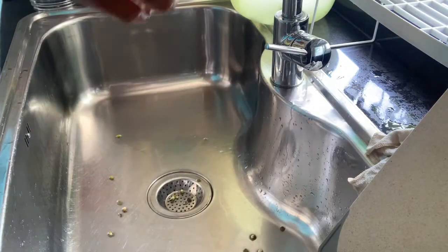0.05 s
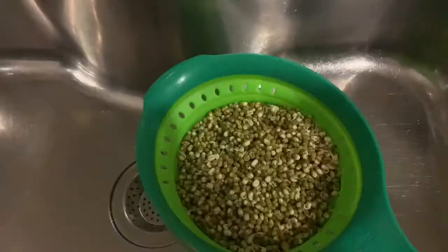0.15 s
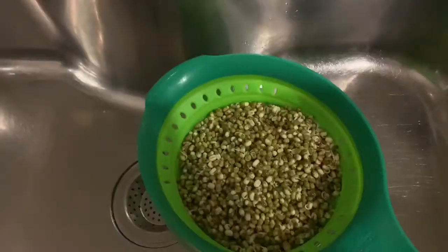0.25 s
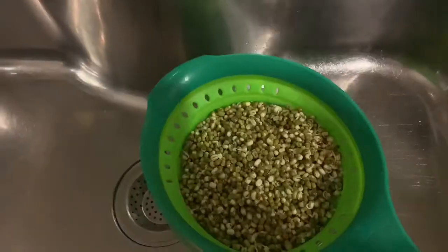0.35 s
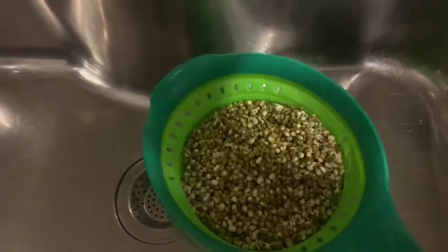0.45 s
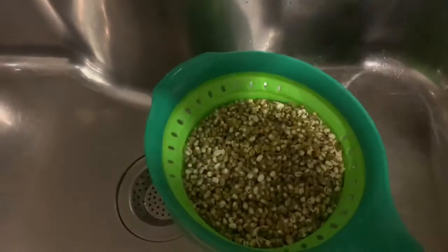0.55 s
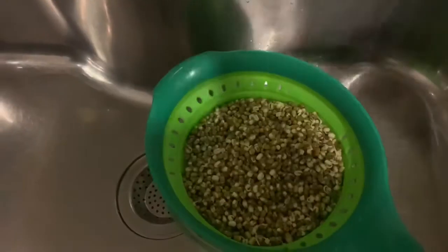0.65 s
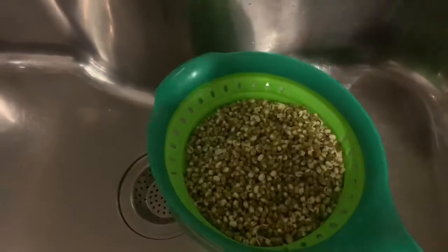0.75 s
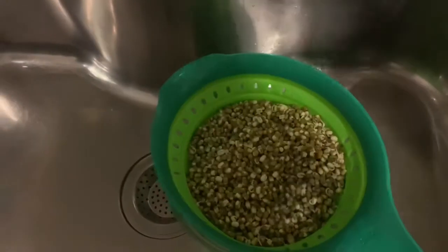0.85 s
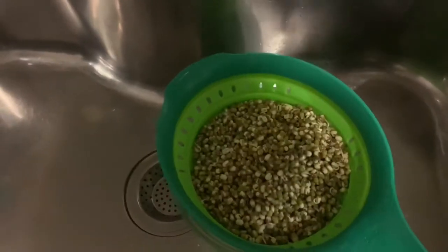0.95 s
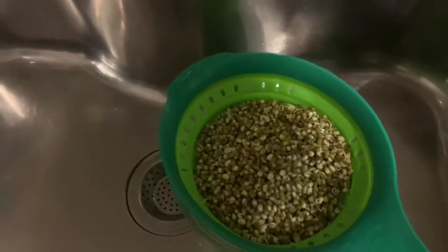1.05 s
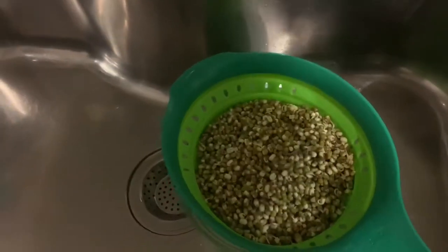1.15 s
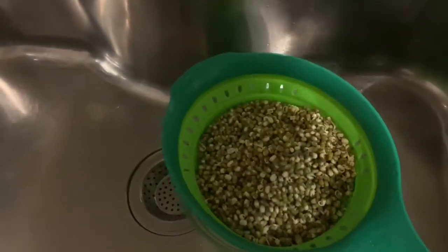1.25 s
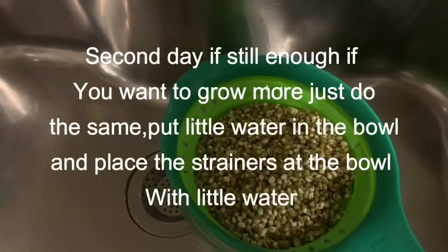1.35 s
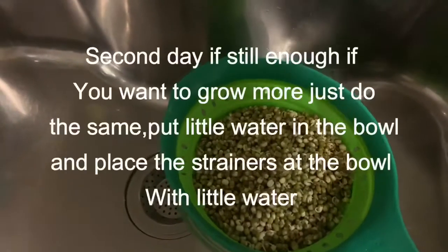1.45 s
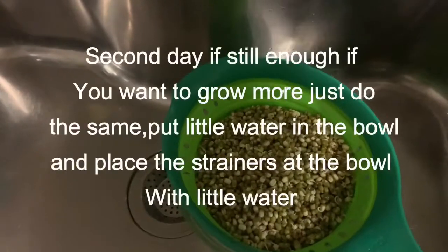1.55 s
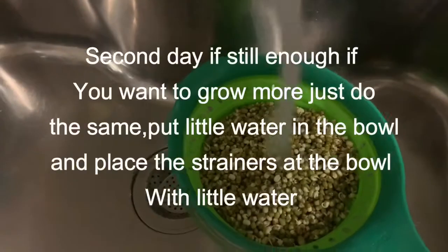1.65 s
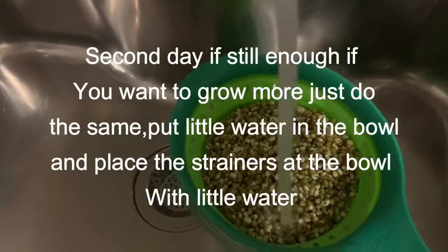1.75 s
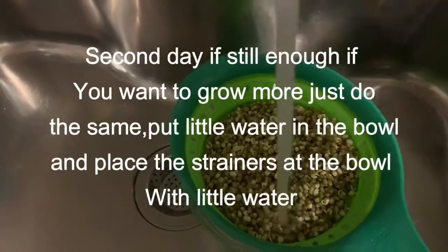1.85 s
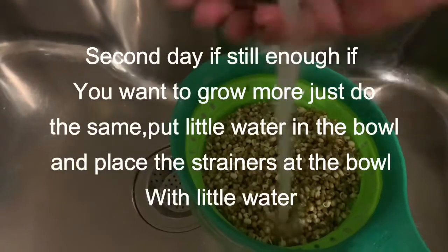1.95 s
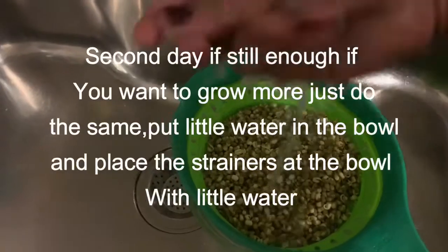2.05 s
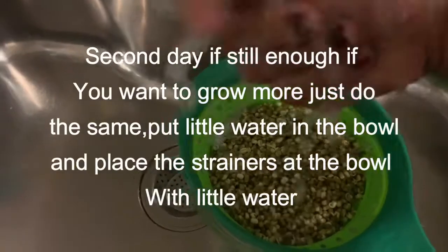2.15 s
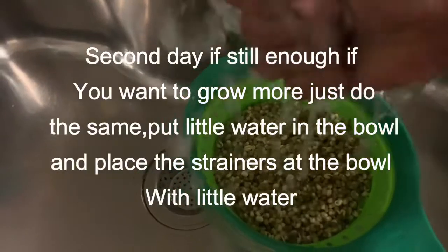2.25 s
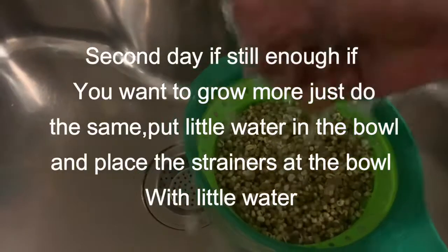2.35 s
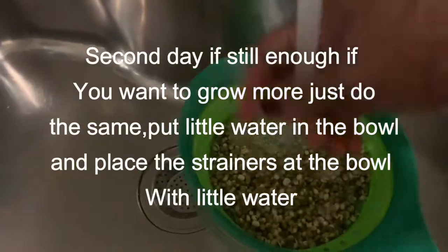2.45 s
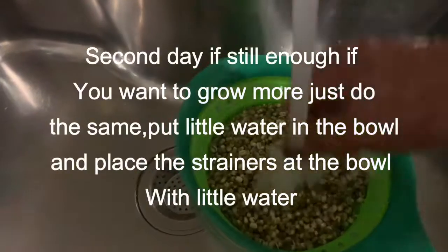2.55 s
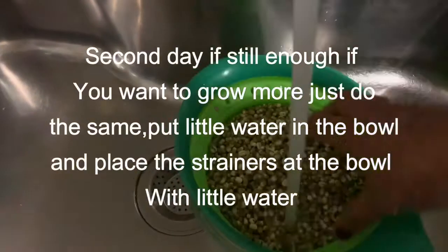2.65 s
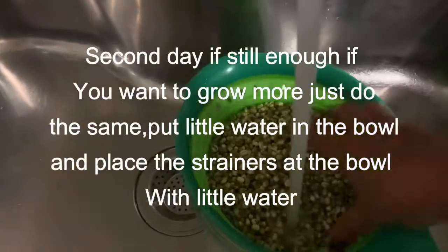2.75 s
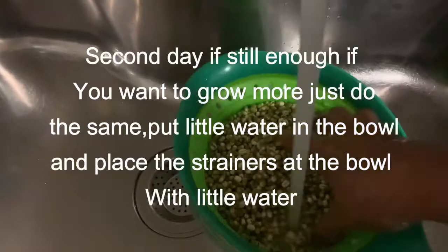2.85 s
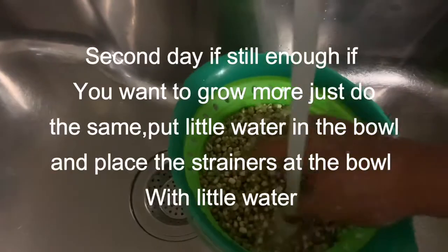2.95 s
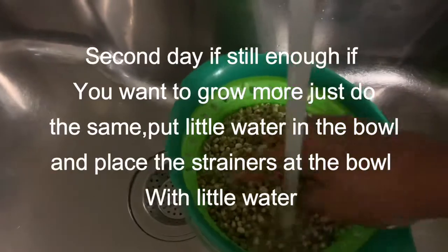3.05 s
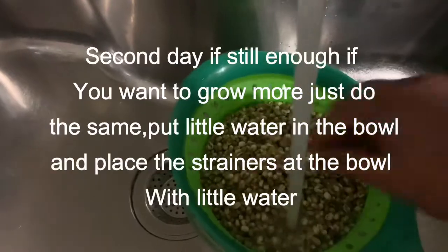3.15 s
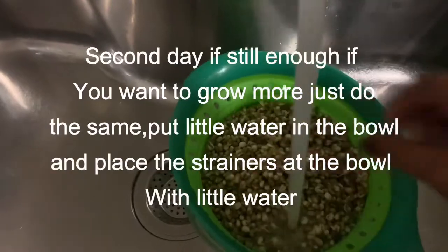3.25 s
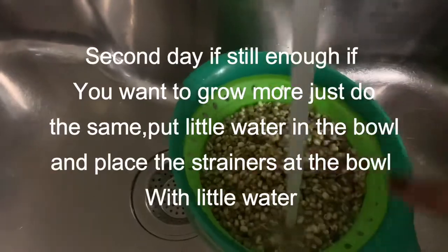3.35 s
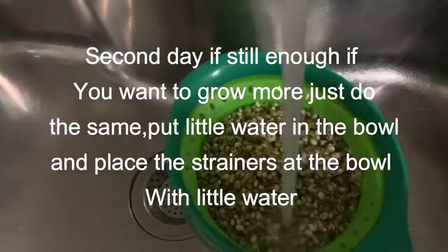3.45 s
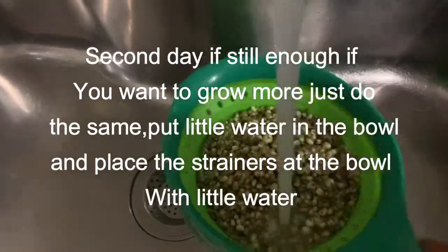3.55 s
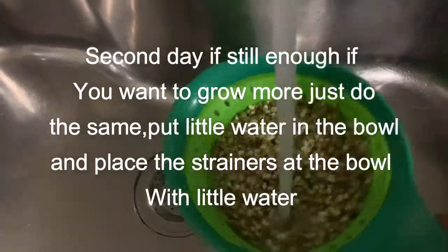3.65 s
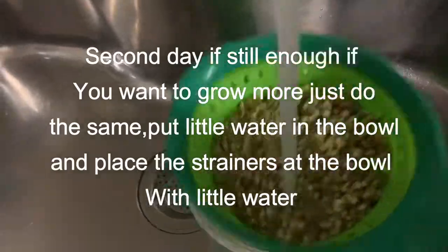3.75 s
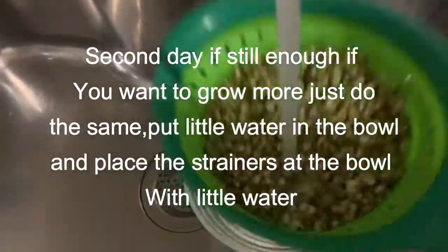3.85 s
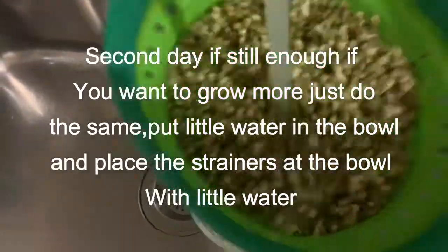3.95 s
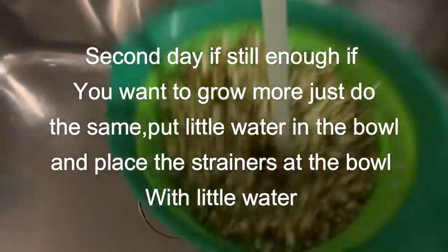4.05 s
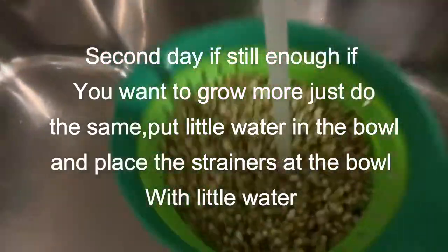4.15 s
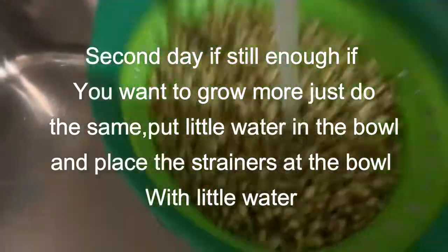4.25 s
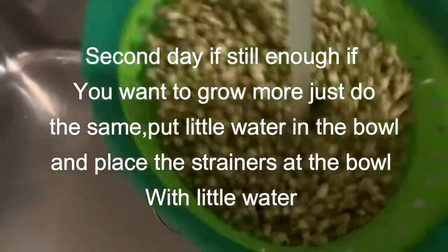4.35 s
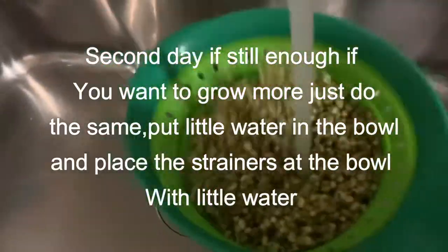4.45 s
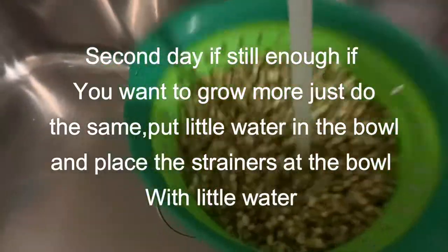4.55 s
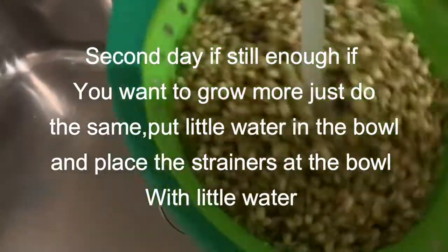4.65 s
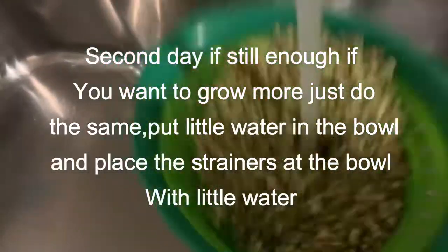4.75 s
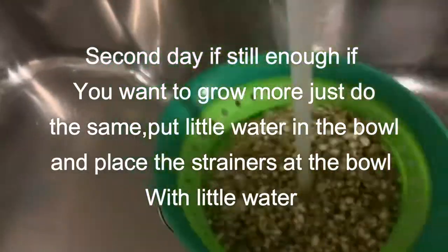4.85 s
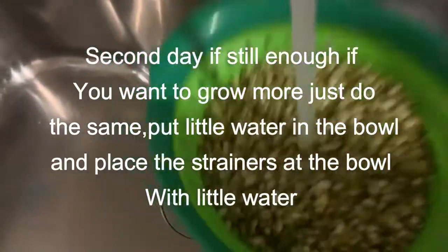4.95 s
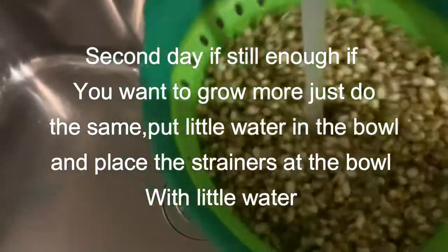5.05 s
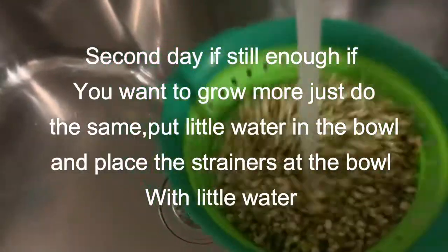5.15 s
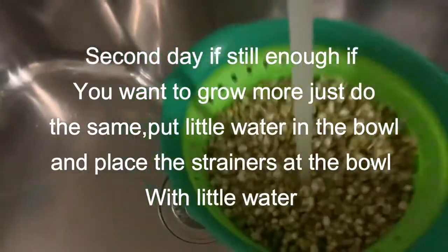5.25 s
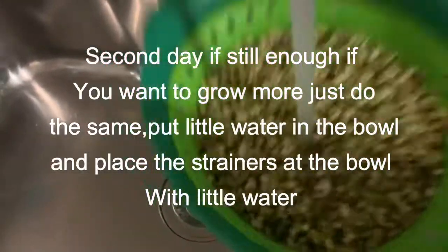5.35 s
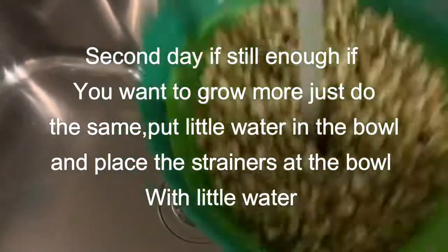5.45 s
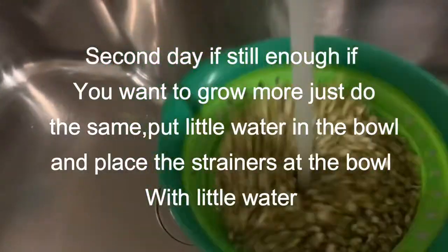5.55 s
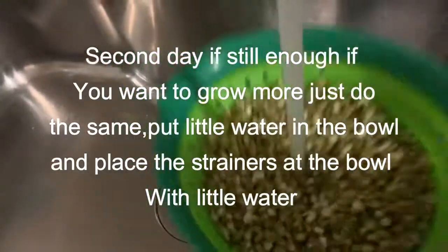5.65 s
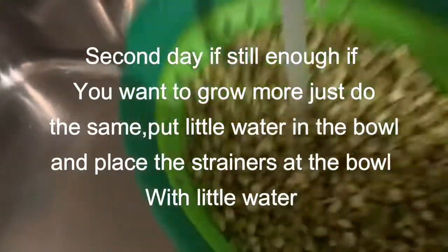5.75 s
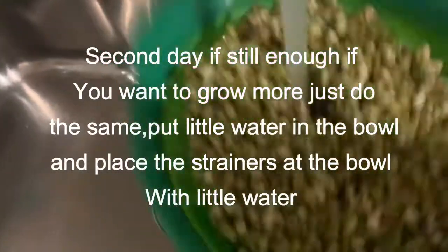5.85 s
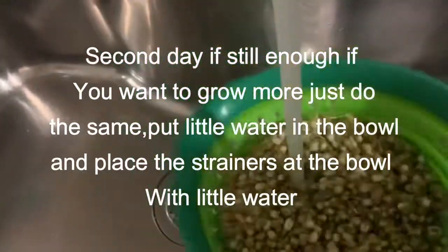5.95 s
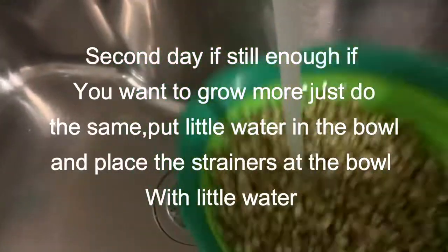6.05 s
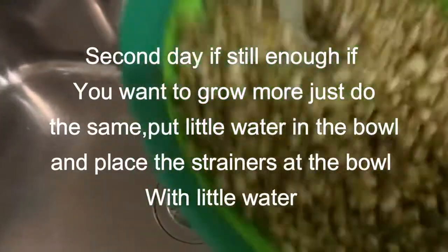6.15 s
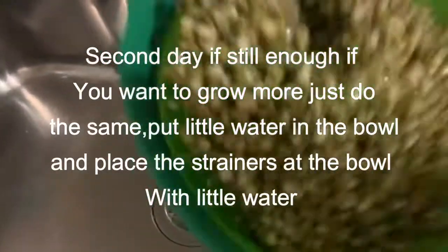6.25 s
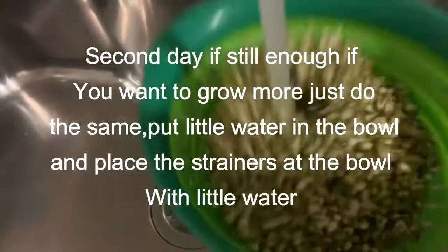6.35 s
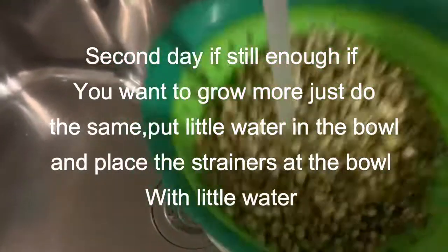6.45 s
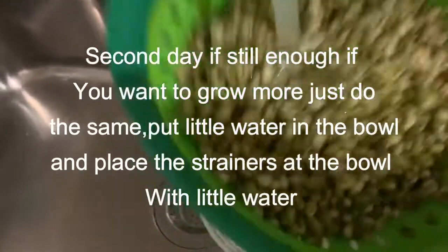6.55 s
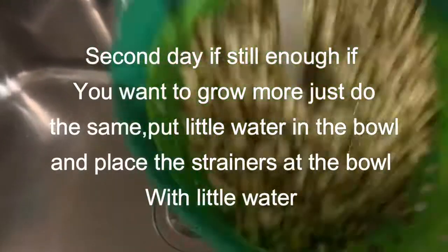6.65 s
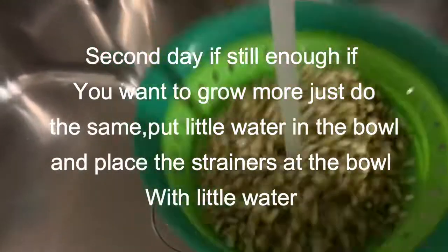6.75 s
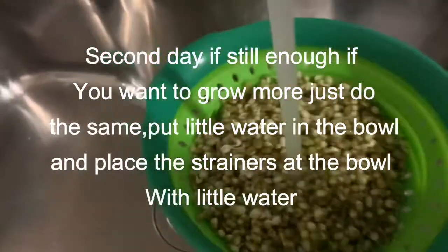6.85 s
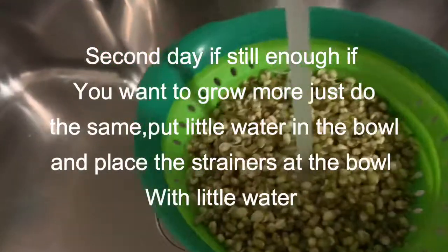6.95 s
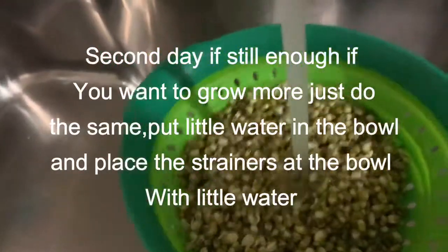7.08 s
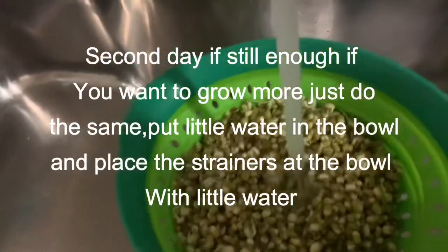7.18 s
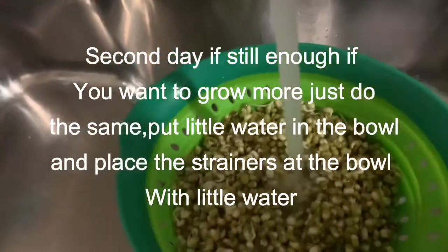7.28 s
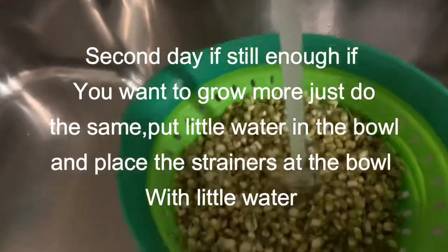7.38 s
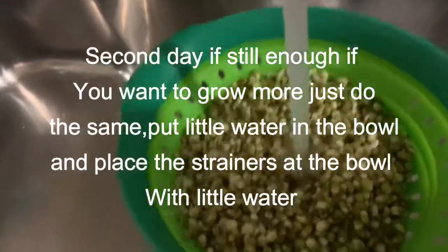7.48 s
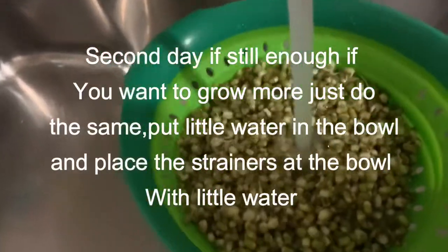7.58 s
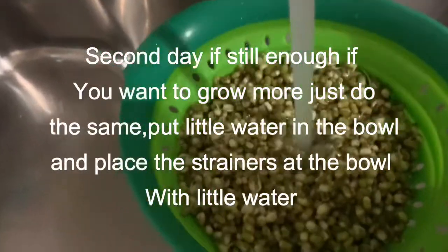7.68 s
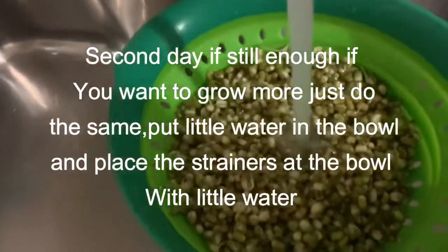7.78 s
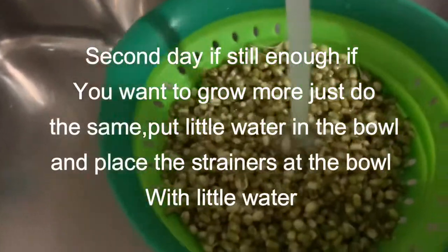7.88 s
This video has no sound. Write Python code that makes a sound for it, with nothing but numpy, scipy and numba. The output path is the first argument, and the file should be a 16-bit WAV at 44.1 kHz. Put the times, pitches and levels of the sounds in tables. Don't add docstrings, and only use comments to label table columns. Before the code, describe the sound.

In a kitchen, close to a steel sink, quiet rumble and soft thuds come first. A tap clicks and suddenly runs, with crisp, sizzling spray and watery gurgles on beans in a plastic strainer. Splashes swell as a hand crosses the jet. Then the strainer is shaken in quick rhythmic tosses, beans clattering in wet clumps between spray bursts, before settling into steadier running water. Handheld stereo phone, slightly crunchy treble.

```python
import sys
import numpy as np
from scipy import signal
from scipy.fft import rfft, irfft
from scipy.io import wavfile
from scipy.ndimage import uniform_filter1d
from numba import njit

SR = 44100
rng = np.random.default_rng(int(sys.argv[2]) if len(sys.argv) > 2 else 0)


def invert_db(x):
    u = np.asarray(x, float) / 20
    return 10 ** u


def materialize(psi):
    bounded = np.clip(np.atleast_2d(psi).T, -1, 1)
    quanta = np.round(bounded * 32767).astype(np.int16)
    wavfile.write(sys.argv[1], SR, quanta)


N = 349272
HZ = np.arange(N // 2 + 1) * SR / N + 1e-3
CUT_S = .148
TAP_OPENS_S = 1.45


def curve(rows):
    s, *columns = np.transpose(rows)
    return [np.interp(np.arange(N) / SR, s, c) for c in columns]


def colour(x, points, lo=20, hi=20000):
    hz, db = np.transpose(points)
    spec = rfft(x) * invert_db(np.interp(np.log(HZ), np.log(hz), db))
    inside = spec[(HZ > lo) & (HZ < hi)]
    return irfft(spec, N) * N / np.sqrt(2 * np.sum(np.abs(inside) ** 2))


def ring(x, modes):
    shape = sum(invert_db(db) / (1 + 1j * (HZ / hz - hz / HZ) * hz / width) for hz, width, db in modes)
    return irfft(rfft(x) * shape, N)


def unit(x):
    return x / np.sqrt(np.mean(x ** 2))


def walk(rate):
    k = int(SR / rate)
    steps = np.repeat(rng.standard_normal(N // k + 1), k)
    return 1.42 * uniform_filter1d(uniform_filter1d(steps, k), k)[:N]


@njit
def rings(length, start, hz, t60, size, glide):
    out = np.zeros(length)
    for k in range(len(start)):
        n = int(t60[k] * SR) + 2
        p, z = np.exp(2j * np.pi * hz[k] / SR - 6.9 / n), size[k] + 0j
        turn = np.exp(2j * np.pi * hz[k] * glide / (SR * n))
        for i in range(max(int(start[k] * SR), 0), min(int(start[k] * SR) + n, length)):
            out[i] += z.imag
            z *= p
            p *= turn
    return out


def grains(count, lo_hz, hi_hz, cycles, spread_db, glide):
    when, pitch, loud = rng.random((count, 3)).T
    hz = lo_hz * (hi_hz / lo_hz) ** pitch
    size = invert_db(np.minimum(-spread_db * np.log(1 - loud), 17)) * hz / lo_hz
    return unit(rings(N, when * N / SR, hz, cycles / hz, size, glide))


def patchy(count, lo_hz, hi_hz, flicker_db, rate):
    edges, shared, out = np.geomspace(lo_hz, hi_hz, count + 1), walk(rate / 2), 0
    for a, b in zip(edges[:-1], edges[1:]):
        band = irfft(rfft(rng.standard_normal(N)) * ((HZ >= a) & (HZ < b)), N)
        out = out + band * invert_db(flicker_db * (walk(rate) + shared))
    return unit(out)


def pair(x):
    return np.array([x, np.roll(x, N // 3)])


def bursts(rows):
    s, db, rise, fall = np.transpose(rows)[:4, :, None]
    since = np.arange(0, N + 64, 64) / SR - s
    slope = np.where(since < 0, -since / np.maximum(rise, .005), since / np.maximum(fall, .005))
    range_db, crest = 12, 1.3
    power = np.sum(invert_db(2 * (db - range_db * slope ** crest)), axis=0)
    return np.interp(np.arange(N) / 64, np.arange(len(power)), power)


# time in seconds, level in dB.
AIR_HISS = [
    (0, -58),
    (.07, -66),
    (.143, -60),
    (.15, -101),
    (7.92, -93),
]
# peak in seconds, level in dB, rise and fall in seconds, pitch in Hz.
GUSTS = [
    (0.105, -71, .03, .07, 14200),
    (.105, -70, 0.025, .07, 3800),
]


def earlier():
    noise = rng.standard_normal(N)
    air = colour(noise, [(800, -17), (2000, 2), (4000, 8), (8000, -6), (11000, -12), (13000, -10),
                         (16000, -14)])
    gusts = 0
    for gust in GUSTS:
        hz = gust[-1]
        gusts = gusts + unit(ring(noise, [(hz, hz / 5, 0)])) * np.sqrt(bursts([gust]))
    gusts = gusts * (np.arange(N) < CUT_S * SR)
    mid, side = pair(air) * invert_db(curve(AIR_HISS)[0]) + pair(gusts) * [[1], [0]]
    return np.array([mid + 0.72 * side, mid - 0.68 * side])


# peak in seconds, level in dB.
BASS_SWELLS = [(1.15, -36), (1.3, -35), (1.52, -28.5), (1.72, -37), (1.98, -34), (2.71, -32.5),
               (3.04, -36), (3.22, -35), (3.51, -29), (3.6, -30.5), (3.93, -38), (4.39, -33), (5.87, -43),
               (6.73, -39)]


def rumble():
    steady_db = curve([(0, -49), (.2, -38)])[0]
    rise_s, fall_s = 0.053, 0.025
    return np.sqrt(invert_db(2 * steady_db) + bursts([(s, db, rise_s, fall_s) for s, db in BASS_SWELLS]))


# frequency in Hz, level in dB per Hz.
ROOM_TONE = [(25, -20.5), (64, 1), (117, -1.5), (236, -10.5), (300, -19), (700, -29), (1400, -35.5),
             (2100, -43), (2800, -46), (4500, -57.5), (6500, -88), (9000, -81), (16000, -75)]
# frequency in Hz, width in Hz, level in dB.
ROOM_MODES = [(78, 5, -6), (112.1, 4.8, 2.5), (185, 10, -21), (241, 21, -8)]
# frequency in Hz, width in Hz, level in dB.
APPLIANCE_WHINE = [(1630, 22, -68.5), (2015, 51, -67.5), (12550, 30, -94), (1560, 12, -79),
                   (1100, 7.9, -75), (900, 8.9, -76), (1290, 18, -78), (2220, 10, -89)]


def room():
    noise = rng.standard_normal((3, N))
    low = colour(noise[0], ROOM_TONE)
    low = low + 0.8 * unit(ring(noise[0], ROOM_MODES))
    low = unit(colour(low, [(250, -6.0), (330, -29)]))
    floor = colour(colour(noise[1], ROOM_TONE), [(250, -30.5), (330, -20.5)], 188, 16000)
    floor = floor * invert_db(-53 + 0.54 * walk(2.65))
    whine = sum(invert_db(db) * unit(ring(noise[2], [(hz, width, 0)])) for hz, width, db in APPLIANCE_WHINE)
    settle_db = curve([(0, 5), (.14, 3.5), (.17, 5.5), (1.44, 7), (1.5, 5), (7.92, -4.5)])[0]
    return pair(low) * rumble() + pair(floor + whine) * invert_db(settle_db)


# start in seconds, peak in dB, ring in Hz.
HANDLE_CLICKS = [(1.271, -54, 8000), (1.7, -46, 5200), (1.338, -36, 2600), (1.336, -43, 4400),
                 (1.5, -46, 800), (1.336, -40, 6500), (1.4, -49, 6600), (1.5, -50, 6900), (1.6, -46, 4500),
                 (1.1, -48, 1200), (1.4, -41, 6800), (1.5, -49, 6600), (1.352, -52, 4000), (1.8, -41, 1000),
                 (1.362, -56, 5500)]
# start in seconds, peak in dB, ring in Hz.
DROPLET_TICKS = [(1.675, -17, 10200), (1.8697, -17, 6300), (1.9445, -26, 10300), (2.3405, -10, 10800),
                 (2.3801, -17, 10250), (2.8954, -25, 9900), (3.0815, -11, 7340), (3.5709, -18, 11000),
                 (3.6477, -11, 7600), (4.718, -26, 2740), (4.8382, -6, 9600), (5.253, -8, 7000),
                 (5.436, -16, 2610), (5.5888, -13, 11000), (5.6579, -8, 7300), (5.856, -11, 2740),
                 (5.907, -8, 10800), (6.2595, -15, 6800), (6.3381, -17, 3650), (6.374, -12, 11100),
                 (6.4029, -26, 9900), (6.6808, -9, 4540), (6.719, -8, 10320), (6.787, -18, 11100),
                 (7.007, -16, 6260), (7.078, -17, 3320), (7.2497, -15, 10400), (7.3133, -14, 11000),
                 (7.5636, -11, 10400), (1.5193, -24, 10800), (1.709, -12, 7240), (1.724, -8, 10400),
                 (1.8904, -11, 11300), (2.3425, -12, 6800), (2.3475, -21, 10400), (2.383, -15, 6130),
                 (4.1328, -14, 10100), (4.4352, -17, 10600), (5.5935, -2, 11200), (5.664, -6, 7200),
                 (5.8724, -13, 3960), (5.881, -10, 3000), (5.9085, -6.5, 5400), (5.979, -9, 7000),
                 (6.02, -8, 10500), (6.347, -14, 3700), (6.405, -10, 11000), (6.4072, -13, 11300),
                 (6.4125, -17, 11000), (6.695, -10.5, 3030), (7.0772, -15, 11900), (4.7787, -20, 2940),
                 (4.843, -19, 2900), (4.9029, -20, 2870), (4.9193, -13, 3500), (4.872, -13, 6350),
                 (4.97, -11.5, 6700), (4.862, -16, 4300), (4.885, -19, 3200)]


def ticks():
    s, db, hz = np.repeat(np.array(list(HANDLE_CLICKS) + list(DROPLET_TICKS)), 12, axis=0).T
    late, detune = rng.random((len(s), 2)).T
    octaves = 1.2 * (detune - .55) * late ** .3
    hz = np.clip(hz * 2 ** octaves, 500, 15500)
    return rings(N, s + .003 * late ** 1.5, hz, .006 + 0 * s, invert_db(db - 9 - 5 * late), 0.)


# start in seconds, peak in dB, ring in Hz, t60 in seconds.
SINK_KNOCKS = [
    (1.338, -32, 500, 0.13),
    (1.496, -23.5, 246.5, 0.24),
    (1.508, -19, 77, 0.2),
    (3.461, -21.5, 77, 0.21),
    (5.871, -33, 113, 0.25),
    (6.721, -29, 241, 0.28),
]


def knocks():
    s, db, hz, t60 = np.array(SINK_KNOCKS).T.copy()
    return rings(N, s, hz, t60, invert_db(db), 0.)


# time in seconds, jet hiss in dB, gurgle in the beans in dB, landing force in dB.
TAP_FLOW = [(1.435, -110, -110, 0), (1.445, -67, -58, 18), (1.46, -37.5, -51, -4.5),
            (1.5, -35.5, -49, -1.5), (1.64, -35.5, -45.5, -3), (2.05, -35.5, -43, -4.5),
            (2.3, -37.5, -45, 2.5), (2.7, -35.5, -42.5, -1), (3.6, -38, -40, 0.5), (4.2, -39, -37, -6.5),
            (5.4, -38.5, -39, 3), (6.2, -40.5, -41.5, 0), (6.45, -32, -40, 0), (6.6, -36.5, -40.5, 0.5),
            (7.0, -37, -44, 3), (7.5, -37.5, -40, 0.7), (7.92, -37, -41, 2.5)]
# peak in seconds, level in dB, rise and fall in seconds,
# coarse drops in dB relative to the fine.
SPRAY_BURSTS = [(1.71, -25, .04, 0.043, -0.5), (1.77, -27.5, .02, .03, -1.5), (1.83, -31, 0.13, 0.57, -3.5),
                (1.891, -25, 0.028, 0.015, -5.5), (2.345, -33, 0.008, 0.016, -5),
                (2.385, -36, 0.033, 0.087, -1.5), (2.62, -28.5, 0.13, 0.11, -1),
                (2.68, -32.5, 0.096, 0.086, -0.5), (2.78, -33.5, 0.089, 0.028, 2.5),
                (2.9, -30, 0.075, 0.16, -4), (3.04, -33, 0.048, 0.018, 1.5), (3.085, -32, 0.012, 0.016, 1),
                (3.67, -28, 0.046, 0.11, -4.5), (3.79, -29.5, 0.18, 0.16, 1),
                (4.141, -26, 0.085, 0.16, -3.5), (4.46, -30, 0.11, 0.13, -1), (4.52, -29.5, .1, 0.18, -3.5),
                (4.84, -29, 0.12, 0.098, -4), (4.88, -31.5, .04, 0.07, -1),
                (4.95, -32.5, 0.072, 0.077, -0.5), (5.269, -25.5, 0.12, 0.1, -1),
                (5.59, -29, 0.11, 0.07, -13), (5.63, -29.5, 0.044, .05, 3.5),
                (5.659, -25, 0.032, 0.088, -5), (5.72, -36.5, .04, 0.073, -3),
                (6.02, -25.5, 0.16, 0.14, -4.5), (6.33, -42, 0.067, .03, -6),
                (6.405, -27, 0.041, 0.033, -5), (6.45, -27, .03, 0.04, -8),
                (6.49, -26.5, 0.055, 0.052, -12), (6.8, -34, 0.091, 0.16, 2), (7.2, -33, 0.33, 0.29, -12)]
# peak in seconds, level in dB, rise and fall in seconds,
# splash in dB relative to the rattle.
BEAN_TOSSES = [(1.51, -43.5, 0.031, 0.082, -11), (2.81, -37.5, .15, 0.075, -6),
               (3.98, -42, 0.14, 0.039, -11), (4.04, -30, 0.037, 0.052, -9), (4.43, -29, 0.15, 0.091, -7),
               (4.75, -29, 0.044, 0.1, -8), (4.81, -29, 0.11, 0.047, -9), (5.13, -36, 0.12, 0.052, -18),
               (5.18, -26.5, 0.088, 0.047, -16), (5.475, -30, .03, .03, -13),
               (5.52, -24, 0.082, 0.068, -10), (5.555, -27.5, .015, 0.035, -13),
               (5.79, -38, 0.09, 0.044, -15), (5.88, -21, 0.025, 0.076, -6), (6.28, -28, 0.038, 0.09, -4),
               (6.47, -34, 0.079, 0.06, -6), (6.565, -31.5, 0.018, 0.04, -5),
               (6.69, -27.5, 0.043, 0.069, -1.5), (6.75, -28.5, 0.097, 0.024, -19),
               (6.85, -38, 0.043, 0.34, -5)]
# peak in seconds, level in dB, rise and fall in seconds.
SIZZLE_BURSTS = [(1.715, -22, 0.04, 0.056), (1.8, -25, 0.098, 0.19), (1.891, -21, .02, 0.013),
                 (2.35, -36, .012, .15), (2.62, -24.5, 0.085, 0.048), (2.78, -35, 0.083, .03),
                 (2.9, -30, 0.055, 0.21), (3.07, -42, 0.077, .025), (3.67, -28, 0.032, .085),
                 (3.79, -26, 0.077, 0.13), (4.14, -30, 0.042, 0.26), (4.48, -27.5, 0.11, .1),
                 (4.86, -28, 0.12, 0.26), (5.27, -22.5, 0.088, 0.059), (5.6, -23, 0.033, .06),
                 (5.665, -24, .025, 0.062), (5.97, -29, 0.036, .05), (6.03, -18.5, 0.054, 0.068),
                 (6.45, -34.5, .07, 0.082), (6.72, -38, .05, 0.031), (6.8, -32, 0.065, 0.18),
                 (7.2, -31.5, 0.28, 0.17)]


def strengths():
    jet, gurgle, landing = invert_db(2 * np.array(curve(TAP_FLOW)))
    on = curve([(1.44, 0.15), (1.46, 0.83)])[0]
    sprays, thrown = np.array(SPRAY_BURSTS), np.array(BEAN_TOSSES)
    level_only = [0, 1, 0, 0]
    fine = sprays[:, :-1]
    coarse = fine + sprays[:, -1:] * level_only
    toss_splash = thrown[:, :-1] + thrown[:, -1:] * level_only
    spray = jet + on * bursts(fine)
    splash = jet * landing * invert_db(2 * -4) + on * (bursts(coarse) + bursts(toss_splash))
    beans = gurgle + on * bursts(BEAN_TOSSES)
    sizzle = jet * invert_db(2 * -7.5) + on * bursts(SIZZLE_BURSTS)
    return np.sqrt([spray, splash, beans, sizzle * invert_db(2 * 1.5 * walk(25))])


# frequency in Hz, level in dB per Hz.
SPRAY_TONE = [(6500, -17.5), (7800, -2), (9500, 1), (11500, -0.5), (13500, -2), (15500, -0.5), (17000, -24)]
# frequency in Hz, level in dB per Hz.
SIZZLE_TONE = [(4300, -15.5), (5400, -6), (6500, 6), (7500, 2), (8600, -29)]


def spray_and_sizzle():
    fizz = grains(count=24000, lo_hz=4870, hi_hz=15570, cycles=9.3, spread_db=2.5, glide=.15)
    mist = patchy(count=7, lo_hz=3985, hi_hz=17840, flicker_db=2.0, rate=60) + .7 * fizz
    return colour(mist, SPRAY_TONE, 9370, 12090), colour(mist, SIZZLE_TONE, 3730, 8850)


# frequency in Hz, level in dB per Hz.
SPLASH_TONE = [(1200, -24), (2000, -11.5), (2800, -1.5), (4200, -2), (5000, -5.5), (6200, -8)]


def splash_drops():
    drops = grains(count=9000, lo_hz=1480, hi_hz=7000, cycles=28., spread_db=4.5, glide=0.14)
    hiss = patchy(count=6, lo_hz=1048, hi_hz=8590, flicker_db=2.5, rate=40)
    return colour(hiss + 0.74 * drops, SPLASH_TONE, 1600, 7200)


# frequency in Hz, level in dB per Hz.
BEANS_TONE = [(200, -7), (400, -2), (700, -3.5), (1100, -1.5), (1600, -1), (2500, -2), (4500, -19.5),
              (8000, -30)]
# frequency in Hz, width in Hz, level in dB.
STRAINER_MODES = [(572, 21, 11.5), (775.5, 10.6, 13.5), (940, 12.4, 17.5), (1050, 16.4, 17),
                  (1238, 100, 10), (1324, 57, 8), (1650, 170, -1.5)]


def beans_and_drum():
    taps = grains(count=5000, lo_hz=279, hi_hz=5260, cycles=0.77, spread_db=3.5, glide=0.)
    gurgle = grains(count=1500, lo_hz=401.6, hi_hz=2518, cycles=126.0, spread_db=8.5, glide=0.14)
    shell = ring(taps, STRAINER_MODES)
    rattle = taps + 1.13 * unit(shell) + 1.5 * gurgle
    wash = patchy(count=6, lo_hz=148.4, hi_hz=8120, flicker_db=-0.5, rate=17)
    beans = colour(wash * 4.74 + rattle, BEANS_TONE, 250, 3900)
    return beans, colour(shell, [(500, -4), (1100, -7.0), (2500, -21.0)])


# frequency in Hz, width in Hz, level in dB.
BASIN_MODES = [(244, 18.7, 2.5), (300.5, 51, -8), (508.5, 13.6, -3.5), (759, 17, -11.5)]


def basin():
    runoff = patchy(count=3, lo_hz=147.8, hi_hz=1200, flicker_db=2.5, rate=12)
    running_db = curve([(TAP_OPENS_S, -110), (1.52, -43), (7.92, -43)])[0]
    return pair(unit(ring(runoff, BASIN_MODES))) * invert_db(running_db)


def water():
    spray, sizzle = spray_and_sizzle()
    splash = splash_drops()
    beans, drum = beans_and_drum()
    sink = basin()
    fine, coarse, rattling, sizzling = strengths()
    out = pair(spray) * fine * invert_db(2.0) + pair(splash) * coarse * invert_db(1.5)
    out = out + pair(sizzle) * sizzling * invert_db(-5.5)
    out = out + pair(drum) * np.sqrt(bursts(BEAN_TOSSES)) * invert_db(-12)
    return out + pair(beans) * rattling * invert_db(0.1) + sink


# start in seconds, peak in dB, ring in Hz.
DROP_CRACKS = [(1.6737, -16, 10300), (1.8697, -15, 11500), (1.9445, -15, 10400), (2.3406, -12, 11100),
               (2.8954, -18, 9950), (3.083, -12, 7350), (3.6472, -11, 7160), (4.1335, -12, 10300),
               (4.806, -12, 7000), (4.8385, -10, 10100), (5.166, -18, 6500), (5.251, -11, 7000),
               (5.5888, -15, 11300), (5.6576, -7, 7280), (5.8726, -15, 3920), (5.906, -10, 10900),
               (5.9614, -14, 6690), (6.3735, -14, 11100), (6.4029, -13, 9910), (6.442, -11, 10500),
               (6.7187, -3.5, 10500), (7.248, -10, 10700)]


def cracks():
    s, db, hz = np.array(DROP_CRACKS).T.copy()
    return rings(N, s, hz, .003 + 0 * s, invert_db(db - 2), 0.)


# start in seconds, peak in dB, ring in Hz.
BEAN_CLUMPS = [(1.674, -20, 1447), (2.797, -32, 760), (3.897, -16.5, 1274), (4.016, -22, 880),
               (4.165, -18.5, 806), (4.271, -27.5, 920), (4.342, -19, 1004), (4.38, -18, 1020),
               (4.633, -18, 1360), (4.718, -14, 2010), (4.758, -25, 600), (5.027, -22, 1130),
               (5.099, -16, 1176), (5.163, -11.5, 1200), (5.247, -19.5, 920), (5.425, -30, 1310),
               (5.627, -28, 950), (5.841, -11, 1080), (5.864, -28, 1050), (5.976, -17, 1050),
               (6.258, -10.5, 1660), (6.408, -20.5, 2000), (6.441, -14, 1190), (6.56, -31, 1400),
               (6.631, -19, 940), (6.679, -12, 1350), (6.717, -16, 1770), (6.872, -20, 1380),
               (7.301, -21, 1970), (7.683, -22.5, 955), (1.718, -23, 2270), (1.887, -22, 2340),
               (1.918, -20, 2150), (2.518, -20, 2460), (2.681, -15, 2430), (3.336, -26, 780),
               (3.744, -31, 1700), (4.068, -18, 1200), (4.134, -32, 1740), (4.398, -15, 1130),
               (4.454, -14, 1200), (4.806, -18, 1110), (5.057, -21, 1050), (5.767, -23, 895),
               (5.855, -12, 1050), (5.881, -15, 1500), (6.071, -27, 1030), (6.242, -19, 1150),
               (6.475, -20, 1100), (6.546, -22, 2100), (7.39, -26, 1020), (7.55, -30, 1030),
               (7.618, -28, 1600), (7.787, -28, 950), (7.817, -26, 960), (5.49, -18, 1100),
               (5.515, -14, 1050), (5.548, -12, 1100), (5.145, -18, 1270), (5.905, -12, 1070)]


def clumps():
    s, db, hz = np.repeat(np.array(BEAN_CLUMPS), 6, axis=0).T
    late, detune = rng.random((len(s), 2)).T
    hz = hz * 2 ** (0.68 * (detune - .5))
    return rings(N, s + 0.015 * late ** 2, hz, 0.041 + 0 * s, invert_db(db - 14), 0.075)


# frequency in Hz, likeness from 0 to 1, left minus right in dB.
PORT_LIKENESS = [(60, .99, -1), (250, .92, -.7), (420, .66, 1.5), (700, .5, 2.5), (1200, .66, 1.5),
                 (2000, .45, .5), (2800, .5, -.5), (5400, .3, -4), (6400, .8, -.5), (8000, .93, 0),
                 (16000, .92, 0)]
# frequency in Hz, left lead in radians.
PORT_LEAD = [(0, 0), (1500, 0), (2900, 1.7), (4400, .6), (5300, 1.4), (6450, 0), (8450, -3.14),
             (11050, -6.28), (13100, -9.1), (13900, -9.7), (15900, -12.57)]


def scene():
    impacts = pair(ticks() + clumps() + cracks()) * [[1], [0]] + knocks()
    direct, scattered = rfft(water() + impacts + room())
    hz, like, pan_db = np.transpose(PORT_LIKENESS)
    like = np.clip(np.interp(HZ, hz, like), 0, 1)
    lead = np.interp(HZ, *np.transpose(PORT_LEAD))
    tilt = invert_db(np.interp(HZ, hz, pan_db) / 2) * np.exp(.5j * lead)
    same, apart = np.sqrt((1 + like) / 2) * direct, np.sqrt((1 - like) / 2) * scattered
    left, right = irfft((same + apart) * tilt, N), irfft((same - apart) / tilt, N)
    return np.array([left, right]) + earlier()


# from and to in seconds, from and to in Hz,
# readier to drop in dB.
STARVED_BANDS = [
    (1.5, 1.6, 2750, 3100, 25),
    (1.5, 1.65, 5500, 5900, 9),
    (1.99, 2.07, 2400, 2750, 9),
    (6.43, 6.51, 3400, 3800, 30),
    (6.41, 6.44, 4900, 5500, 9),
    (6.475, 6.51, 4900, 5500, 9),
    (1.47, 7.92, 8270, 8950, 3),
    (1.47, 7.92, 13100, 13780, 3),
    (1.47, 7.92, 7580, 8270, 1),
]


def margin(power, s, band_hz):
    waver = 2.6 * uniform_filter1d(rng.standard_normal(power.shape), size=3, axis=2) * np.sqrt(3)
    treble = power[:, 16:]
    smooth = uniform_filter1d(power, size=5, axis=2)
    under_db = 10 * np.log10((treble.max(axis=(0, 1)) + 1e-18) / (smooth + 1e-18))
    waver[:, :16] -= np.clip(.6 * (under_db[:, :16] - 9), -2, 3)
    treble_db = 10 * np.log10(treble.mean(axis=(0, 1)) + 1e-18)
    waver += np.clip(.25 * (treble_db + 62.5), -3, 3) * (s > TAP_OPENS_S)
    for a, b, lo, hi, db in STARVED_BANDS:
        waver[0] -= db * (s > a) * (s < b) * (band_hz > lo) * (band_hz < hi)
    return 5.5 + waver


SHARP_ATTACKS = [
    (0, .14),
    (1.44, 1.47),
    (2.32, 2.353),
    (3.635, 3.66),
    (6.35, 6.39),
]


def thin(stereo):
    size, count = 2048, 16
    wide = 20
    sum_and_difference = np.array([stereo[0] + stereo[1], stereo[0] - stereo[1]]) / 2
    hz, s, z = signal.stft(sum_and_difference, SR, "cosine", size)
    lines = np.abs(z[:, :-1]) ** 2
    power = lines.reshape(2, size // 2 // count, count, -1).mean(axis=2)
    margin_db = margin(power, s, hz[count // 2::count, None])
    judged = power.copy()
    judged[:, wide:] = np.repeat(power[:, wide::2] + power[:, wide + 1::2], 2, axis=1)
    margin_db[:, wide + 1::2] = margin_db[:, wide::2]
    kept = np.repeat(judged * invert_db(2 * margin_db) > judged[::-1], count, axis=1)
    cracking = np.any(np.abs(s - np.array(DROP_CRACKS)[:, :1]) < .02, axis=0)
    kept &= (lines > np.repeat(power, count, axis=1) * invert_db(2 * -2.5)) | cracking
    safe = hz[:-1, None] < np.where(s < TAP_OPENS_S, 6500, 1800)
    sharp = np.any([(s > a) & (s < b) for a, b in SHARP_ATTACKS], axis=0)
    z[:, :-1] *= kept | safe | sharp
    z[:, (hz > 8000) & (hz < 11300)] *= s > .13
    z[:, hz > 15800] = 0
    mid, side = signal.istft(z, SR, "cosine", size)[1][:, :N]
    return np.array([mid + side, mid - side])


def low_pass(x):
    return signal.sosfilt(signal.butter(12, 17100, fs=SR, output="sos"), x)


def record(dry):
    dry = signal.sosfilt(signal.butter(2, 40, "high", fs=SR, output="sos"), dry)
    thinned = thin(dry)
    join = np.interp(np.arange(N) / SR - CUT_S, [-.006, -.005, .004, .007], [1, 0, 0, 1])
    fade_in = np.clip(np.arange(N) / 300, 0, 1)
    return low_pass(join * fade_in * thinned)


dry = scene()
out = record(dry)
materialize(out)
```